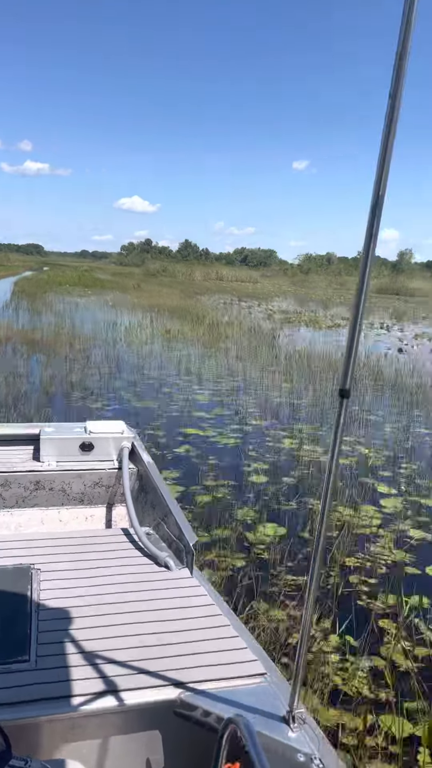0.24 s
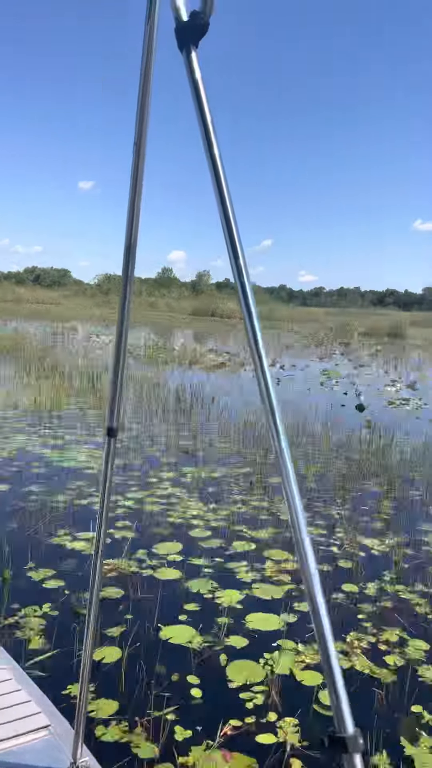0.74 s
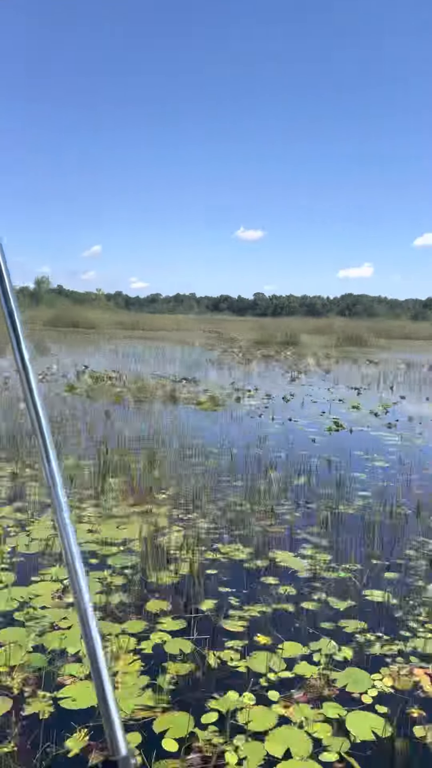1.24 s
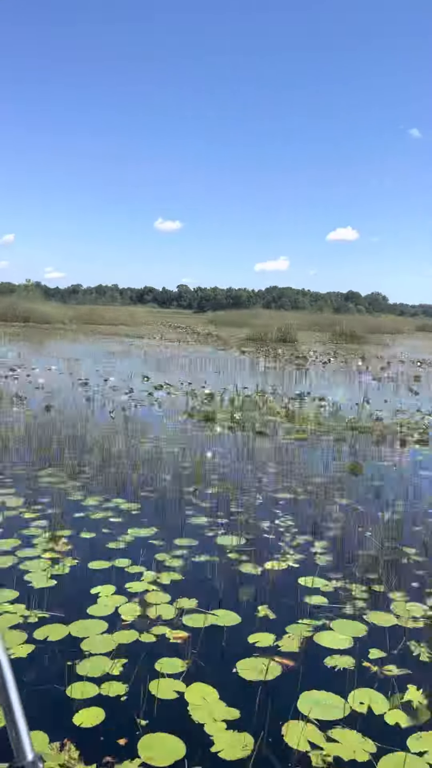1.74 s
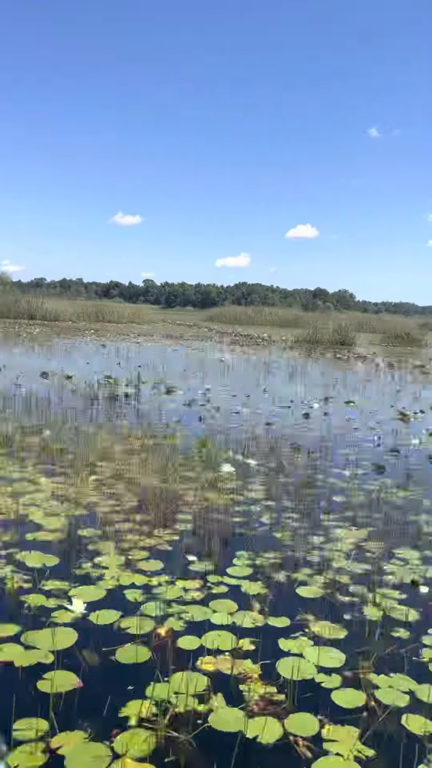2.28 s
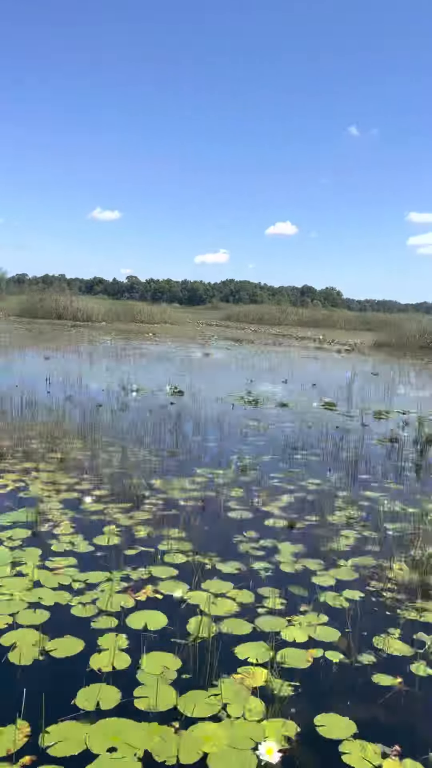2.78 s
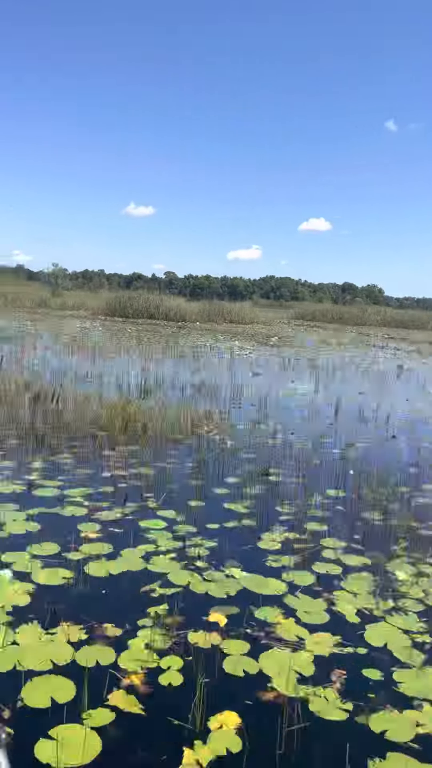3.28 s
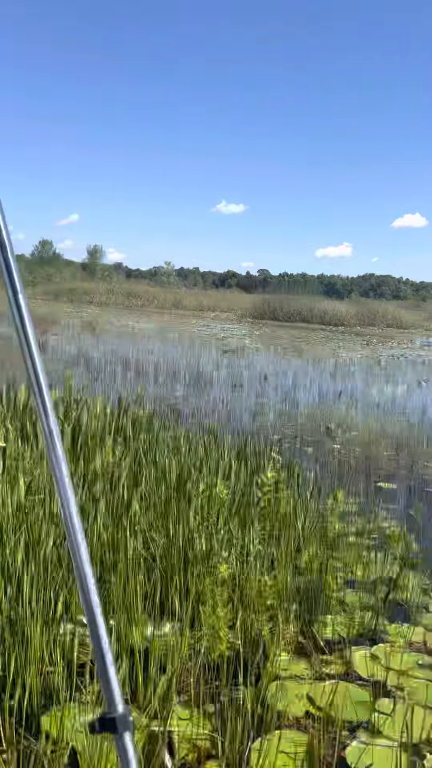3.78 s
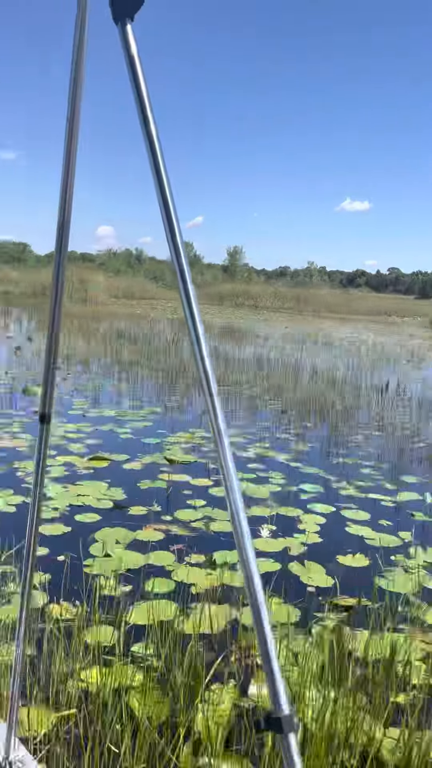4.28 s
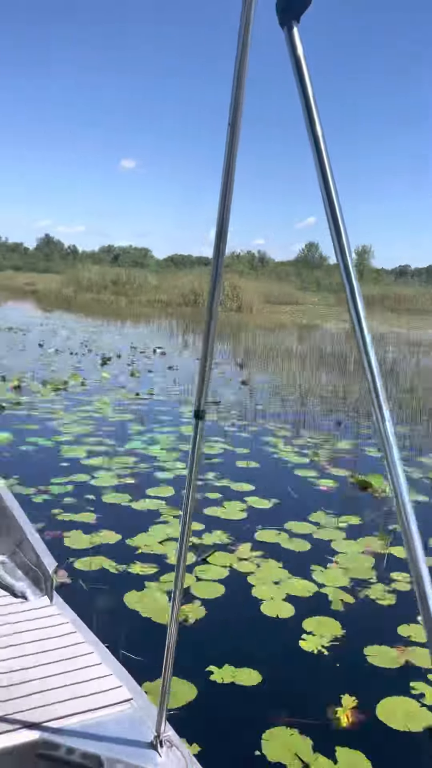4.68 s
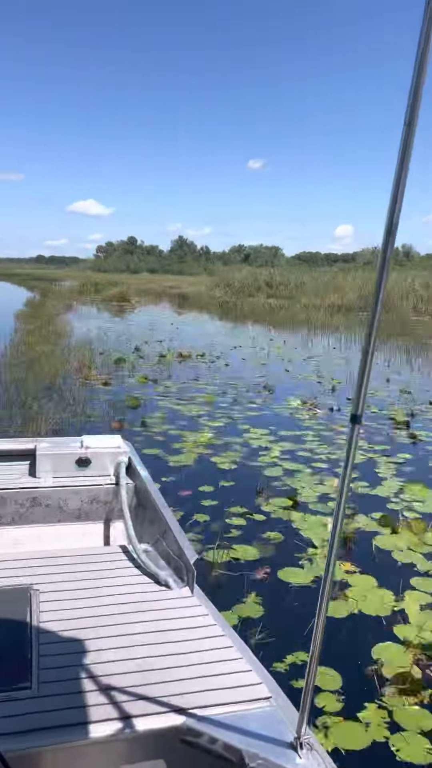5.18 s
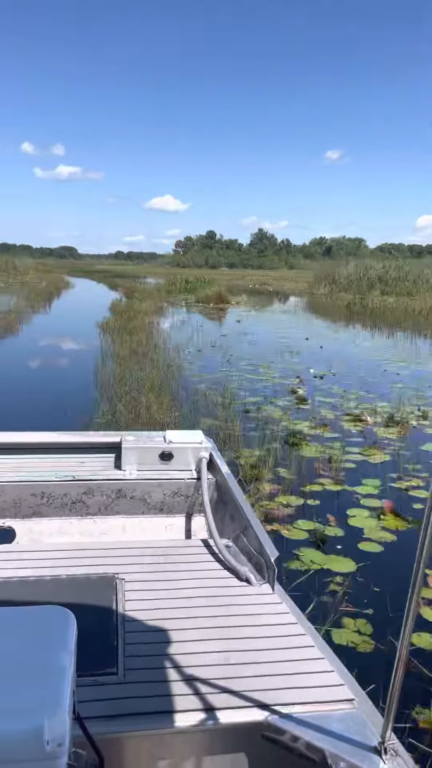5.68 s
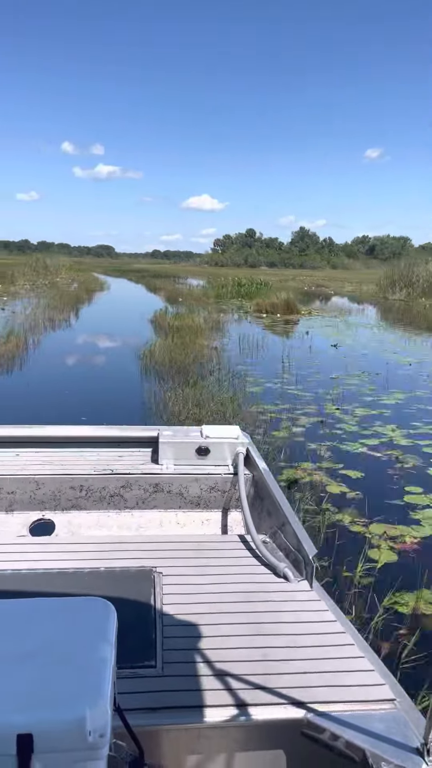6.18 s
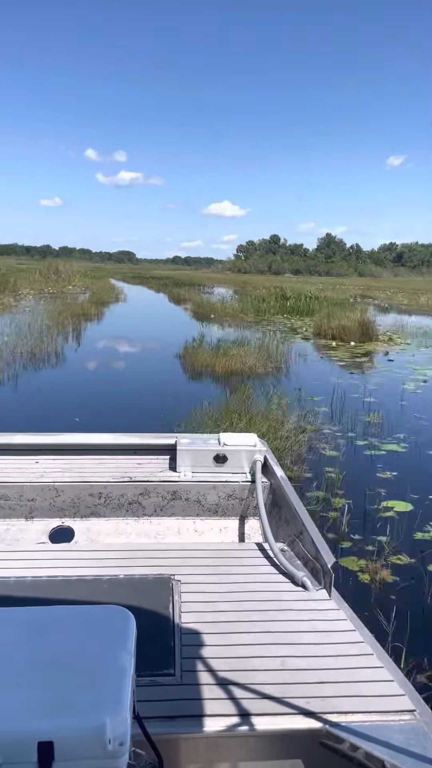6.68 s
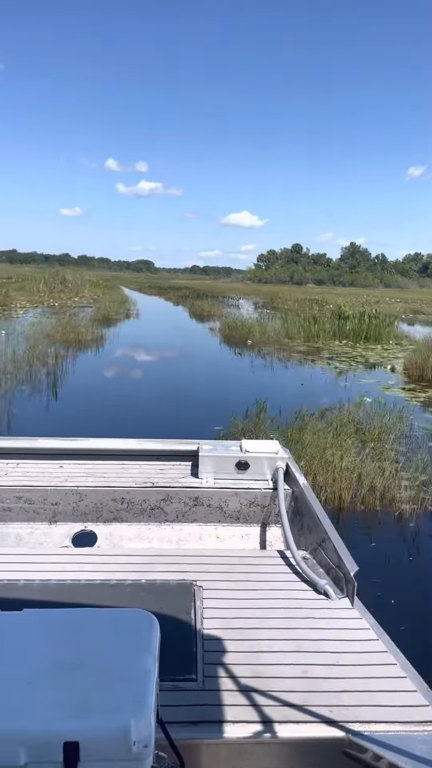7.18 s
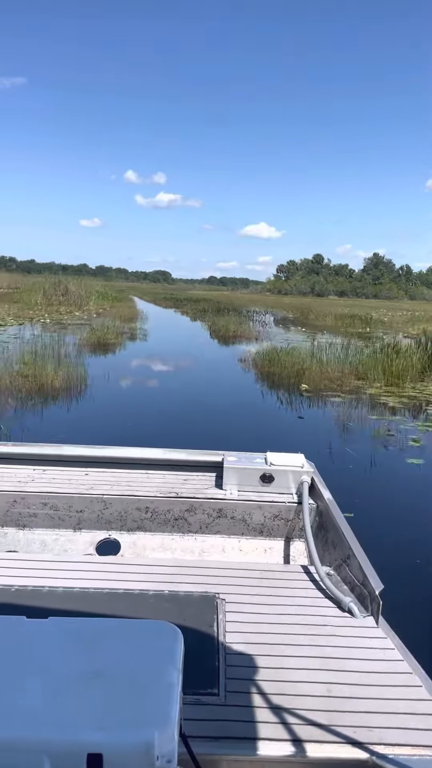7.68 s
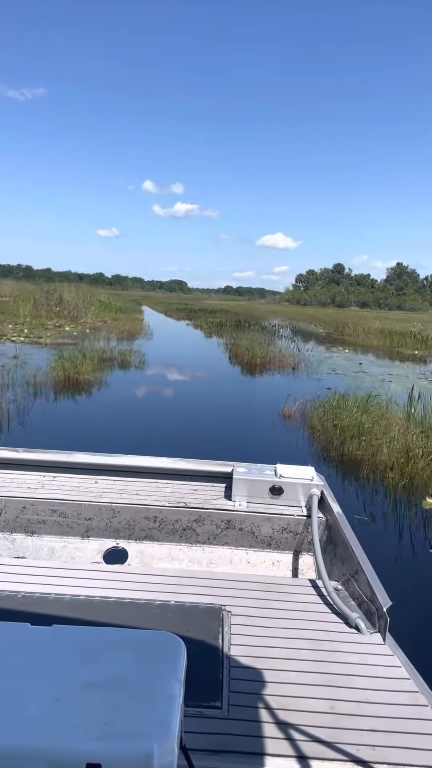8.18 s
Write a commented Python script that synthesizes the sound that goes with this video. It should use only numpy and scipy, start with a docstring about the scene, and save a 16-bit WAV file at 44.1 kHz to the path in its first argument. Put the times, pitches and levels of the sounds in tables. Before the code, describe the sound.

An airboat runs at constant throttle through an open marsh. Its large propeller gives a deep, buzzing hum with a slow throb about once a second, fused with engine exhaust and a broad roar of air. A hand-held stereo phone aboard swings aside and back, so the tone colour shifts slightly and the deepest hum thins late on. Close, loud, without echo.

```python
"""An airboat's geared three-blade propeller hums and roars at steady throttle, ahead of a hand-held stereo phone.
Blade passes and the exhaust are sums of sines locked to their shafts; the air roar is shaped noise.
One exhaust tone lies about a hertz beside a blade tone, so the two beat and the drone throbs.
As the phone swings aside and back, its holder shades the tones and the roar by different amounts."""
import sys
import numpy as np
from scipy import signal
from scipy.io import wavfile
from scipy.ndimage import uniform_filter1d

SR = 44100
rng = np.random.default_rng(int(sys.argv[2]) if len(sys.argv) > 2 else 0)


def transcribe(signal):
    """Save signal, clipped to [-1, 1], as a 16-bit WAV file at the path in sys.argv[1]."""
    frames = np.atleast_2d(signal).T
    limited = np.clip(frames, -1, 1)
    pcm = np.round(limited * 32767).astype(np.int16)
    wavfile.write(sys.argv[1], SR, pcm)


def amplitude_ratio(level_db):
    """Convert a level in decibels to the matching linear amplitude (field) ratio."""
    exponent = np.asarray(level_db, float) / 20
    return 10 ** exponent


N = 372644  # samples

# swing of the phone to the side and back: (time [s], aim [0 ahead - 1 aside],
# level of the deepest tones [dB], level of the drone [dB], level of the treble [dB])
SWING = [(0, .1, 6, 1.3, 2.5), (.35, .3, 4, 2, 2.5), (.7, .6, 2, 3.5, 2), (1.05, 0.84, 5.5, 2.5, 1.7),
         (1.5, 1, 0.5, 0.7, -0.5), (2.1, 0.82, 0, 1.3, -0.8), (2.6, 0.95, 4.5, 0.9, -0.6),
         (3.3, 0.83, 1.5, -0.1, 0), (4.0, 0.56, 4, -0.1, 0.2), (4.6, 0.45, 2, 0, 0),
         (5.2, .15, -5.5, -1, -0.2), (6.2, .1, -6, -1.5, -0.2), (7.2, .05, -9, -1.3, -0.6),
         (8.45, .15, -5, -1, 0.1)]


def evened(x):
    """Normalization: scales a signal to rms 1."""
    return x / np.sqrt(np.mean(x ** 2) + 1e-20)


def read_spectrum(points, hz):
    """Spectral envelope: interpolates a table linearly along a logarithmic frequency axis."""
    f, value = np.transpose(points)
    return np.interp(np.log(hz + 1), np.log(f + 1), value)


def columns(table, t):
    """Time envelopes: interpolates each value column of a table at the times t."""
    s, *values = np.transpose(table)
    return np.array([np.interp(t, s, v) for v in values])


def wander(t, top_hz):
    """Slow random modulation of rms 1: sines of random phase, weaker towards high rates."""
    rates = np.geomspace(.2, top_hz, 16)
    return evened(sum(np.sin(2 * np.pi * (f * t + rng.random())) / np.sqrt(f) for f in rates))


def shaft_turns():
    """Rotation angle: the integral of shaft speed, in turns from the moment when the throb peaks."""
    # propeller shaft: (time [s], speed [turns per s])
    shaft = [(0, 24.11), (1.5, 24.125), (2.5, 24.11), (4.5, 24.118), (5.5, 24.136), (8.45, 24.148)]
    in_step_s = .505  # exhaust and blade tones add up here
    turns = np.cumsum(columns(shaft, np.arange(N) / SR)[0]) / SR
    return turns - turns[round(in_step_s * SR)]


def roar(turns):
    """Turbulence noise: random spectra in drifting patches, mid and side mostly unrelated, swelling per blade."""
    # air roar in the mid signal: (frequency [Hz], level [dB per Hz])
    roar_mid = [(70, -46.5), (180, -49), (250, -51), (470, -53), (700, -56.5), (1000, -62.5), (1700, -65.5),
                (2100, -70.5), (3000, -66.5), (3900, -72), (5200, -73.5), (8000, -82.5), (10000, -104),
                (13000, -104), (15300, -90.5)]
    # air roar in the side signal: (frequency [Hz], level [dB per Hz])
    roar_side = [(55, -56.5), (100, -53.5), (250, -50.5), (400, -46.5), (550, -46.5), (700, -49.5),
                 (1000, -56.5), (1300, -61.5), (2100, -75.5), (2800, -73), (3900, -79), (5200, -76.5),
                 (8200, -77.5), (13000, -86.5), (14200, -84.5), (15700, -85.5)]
    # swell of the roar as each blade passes: (frequency [Hz], depth [0-1])
    swish = [(300, 0), (900, 0.05), (1900, 0.12), (3000, 0.13), (6000, 0), (12000, 0.8)]
    # part of the side roar that follows the mid roar: (frequency [Hz], share [0-1])
    tied_share = [(1200, 0), (1900, .55), (3000, .6), (4200, .3), (7000, .2), (9000, 0)]
    tied_rad = 1.3  # phase lead of that part, so left is early and a little louder
    # columns of the next two: (rumble in mid, body in mid, rumble and body in side)
    # share of the drone level followed [dB per dB]
    roar_share = [0.77, 1, 0.9]
    # level gained from aimed ahead to aimed aside [dB]
    roar_aside_db = [0.5, 2.3, 1]

    frames = N // 256 + 5
    hz = np.fft.rfftfreq(1024, 1 / SR)
    real, imaginary, patches = rng.standard_normal((3, 2, 513, frames))
    patches = uniform_filter1d(patches, size=10, axis=1)  # spread over frequency
    patches = evened(uniform_filter1d(patches, size=12, axis=2))  # spread over time

    aim, _, drone_db, bright_db = columns(SWING, np.arange(frames) * 256 / SR)
    rumble_db, body_db, low_side_db = np.outer(roar_share, drone_db) + np.outer(roar_aside_db, aim - .5)

    # three bands that overlap around 250 and 1500 Hz and sum to 1
    below_250, below_1500 = [1 / (1 + (hz[:, None] / edge_hz) ** 4) for edge_hz in (250, 1500)]
    rumble, body, rush = below_250, below_1500 - below_250, 1 - below_1500
    treble_db = rush * bright_db
    mid_db = read_spectrum(roar_mid, hz)[:, None] + rumble * rumble_db + body * body_db + treble_db
    side_db = read_spectrum(roar_side, hz)[:, None] + (rumble + body) * low_side_db + treble_db

    mid_noise, free_noise = real + 1j * imaginary
    tied = read_spectrum(tied_share, hz)[:, None]
    side_noise = tied * np.exp(1j * tied_rad) * mid_noise + np.sqrt(1 - tied ** 2) * free_noise
    per_bin = np.sqrt(3 * SR / 2048)  # from level per hertz to level per bin
    level = amplitude_ratio(np.array([mid_db, side_db]) + 1.14 * patches)  # patches vary by 1.14 dB rms
    spectra = per_bin * np.array([mid_noise, side_noise]) * level

    depth = read_spectrum(swish, hz)[:, None]
    steady, swung = (signal.istft(spectra * w, nperseg=1024, noverlap=768)[1][:, :N] for w in (1, depth))
    swell = np.cos(2 * np.pi * 3 * turns) + 0.25 * np.cos(2 * np.pi * 6 * turns)
    return steady + swung * swell


def tones(orders, turns, waver_db, drift_rad):
    """Order synthesis: sines at multiples of a shaft's rate; turbulence makes higher ones waver more."""
    # shading of tones from 90 Hz up: (frequency [Hz], level aimed ahead [dB], level aimed aside [dB],
    # share of the drone level followed [dB per dB])
    shade = [(142, -1.4, -0.65, 1.04), (217, 2.5, -3, 0.38), (332, 0.5, 1, .8), (504, -6, 5, 0.25),
             (1500, 6.5, -3.5, 1.4)]
    # lean of the tones, mostly to the right: (frequency [Hz], side signal as a share of mid)
    lean = [(72, 0.0049), (144, -0.086), (300, -0.36), (520, -0.41), (750, -.5), (1500, -0.59)]
    deep_hz = 90  # tones below follow the level of the deepest tones

    t = np.arange(N) / SR
    slow = np.arange(0, N / SR + .02, .01)
    aim, deep_db, drone_db, _ = columns(SWING, slow)
    shade_hz, *shade_values = np.transpose(shade)
    out = np.zeros((2, N))
    for order, db in orders:
        hz = order * (turns[-1] - turns[0]) * SR / N  # mean frequency
        ahead_db, aside_db, share = (np.interp(np.log(hz), np.log(shade_hz), v) for v in shade_values)
        if hz < deep_hz:
            shade_db = deep_db
        else:
            shade_db = ahead_db + (aside_db - ahead_db) * aim + share * drone_db
        unrest = min(hz / 500, 1.5)
        gain = amplitude_ratio(db + shade_db + waver_db * unrest * wander(slow, top_hz=8))
        scatter = 2 * np.pi * rng.random() * (hz > 250)  # only the lowest tones add to one clean pulse
        phase = scatter + drift_rad * unrest * wander(slow, top_hz=6)
        angle = 2 * np.pi * order * turns + np.interp(t, slow, phase)
        sine = -np.sqrt(2) * np.interp(t, slow, gain) * np.cos(angle)
        out += np.array([[1], [read_spectrum(lean, hz)]]) * sine
    return out


def exhaust(turns):
    """Periodic firing: tones at whole and half multiples of the crank rate, geared to the propeller."""
    # exhaust tones before shading: (crank order, level [dB rms])
    exhaust_orders = [(1.5, -45.0), (2.0, -44.0), (2.5, -19.0), (3.0, -46.0), (4.0, -41.0), (6.5, -43.0),
                      (8.0, -50.0)]
    gear = 50 / 21  # crank turns per shaft turn
    return tones(exhaust_orders, gear * turns, waver_db=1.5, drift_rad=.1)


def propeller(turns):
    """Blade-pass harmonics: multiples of three shaft turns; unequal blades add the orders between."""
    # propeller tones before shading: (shaft order, level [dB rms])
    blade_orders = [(3, -28), (5, -45), (6, -26), (7, -46), (8, -49), (9, -32), (12, -37), (15, -36.5),
                    (18, -38), (19, -48), (21, -33), (22, -50), (24, -38), (27, -50), (30, -45), (32, -53),
                    (33, -51), (36, -57), (44, -56), (47, -55), (48, -55), (50, -56), (53, -54), (56, -58),
                    (57, -56), (60, -57), (62, -56), (63, -57), (65, -58), (66, -54), (69, -54), (72, -59)]
    return tones(blade_orders, turns, waver_db=1.3, drift_rad=.3)


def scene():
    """Superposition: the sources add in mid and side, then sum and difference give left and right."""
    turns = shaft_turns()
    mid, side = propeller(turns) + exhaust(turns) + roar(turns)
    return np.array([mid + side, mid - side])


def low_pass(x):
    """Removes everything above the highest recorded frequency."""
    return signal.sosfilt(signal.butter(12, 17100, fs=SR, output="sos"), x)


def record(dry):
    """Band limiting and saturation: the phone cuts deep bass, rounds off the highest peaks and cuts the top."""
    # pass band of the phone: (lower edge [Hz], upper edge [Hz])
    band_hz = [60, 15720]
    bass_cut = signal.butter(4, band_hz[0], "highpass", fs=SR, output="sos")
    passed = signal.sosfilt(bass_cut, dry)
    over = np.maximum(abs(passed) - .6, 0)  # part of each peak above 0.6
    rounded = passed - np.sign(passed) * (over - .3 * np.tanh(over / .3))
    top_cut = signal.firwin(1023, band_hz[1], window=("kaiser", 9), fs=SR)
    mix = signal.oaconvolve(rounded, top_cut[None], "same")
    return low_pass(mix)


dry = scene()
out = record(dry)
transcribe(out)
```